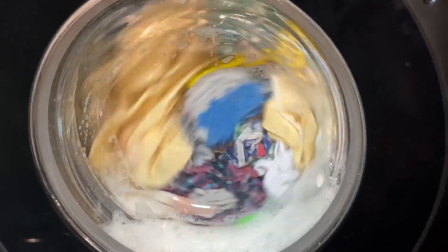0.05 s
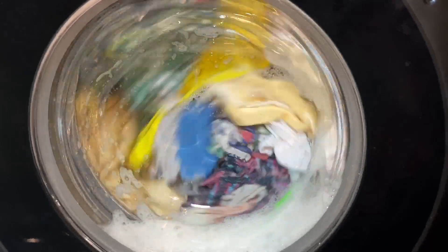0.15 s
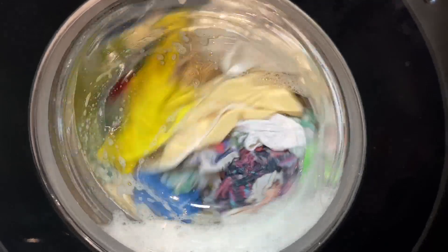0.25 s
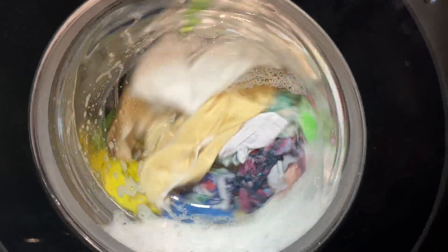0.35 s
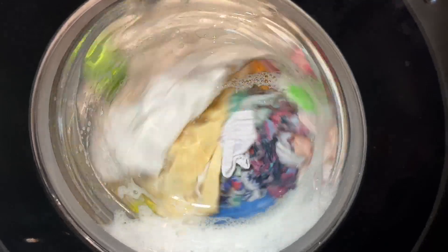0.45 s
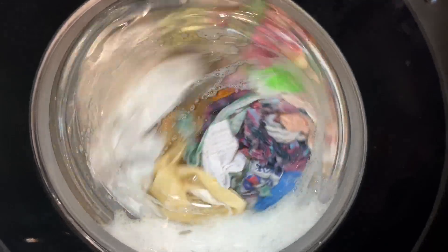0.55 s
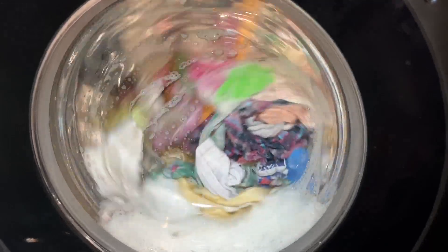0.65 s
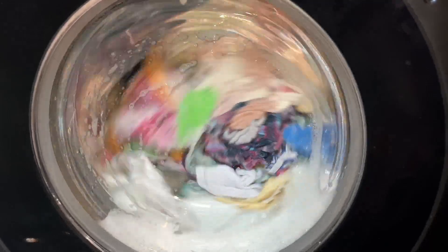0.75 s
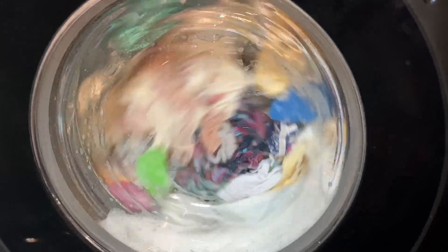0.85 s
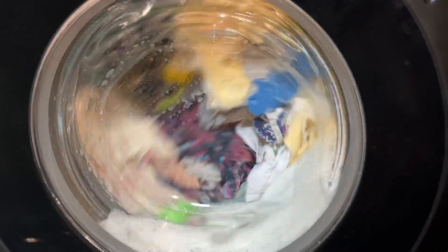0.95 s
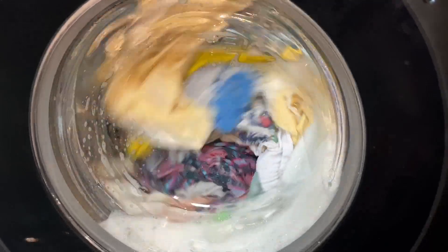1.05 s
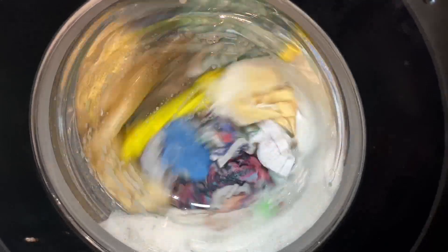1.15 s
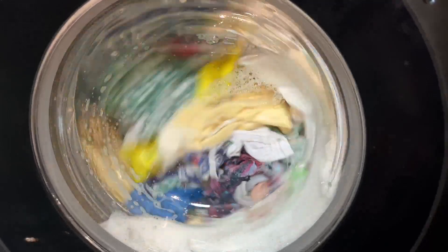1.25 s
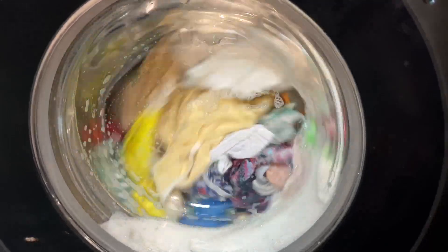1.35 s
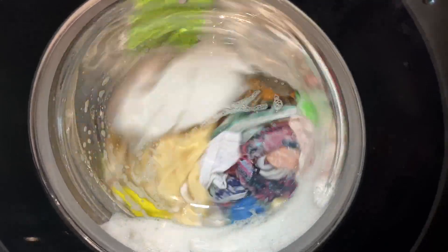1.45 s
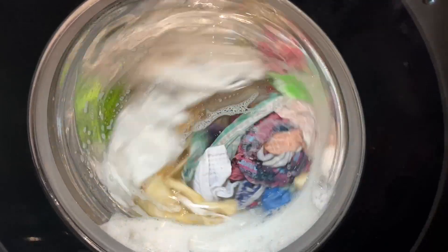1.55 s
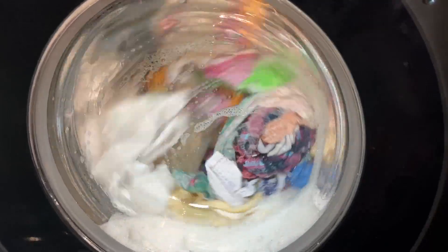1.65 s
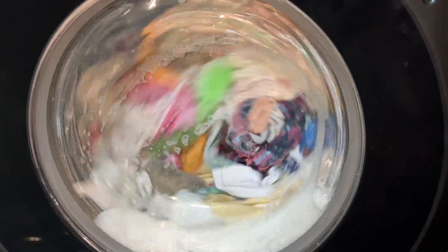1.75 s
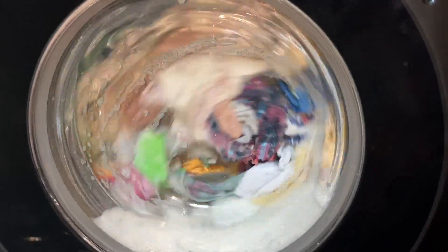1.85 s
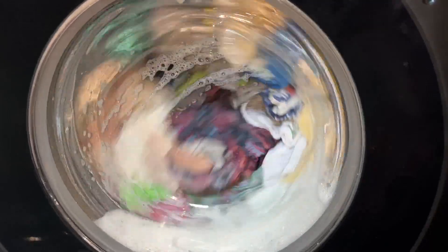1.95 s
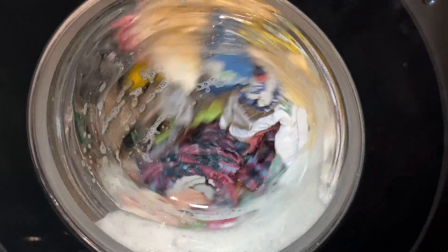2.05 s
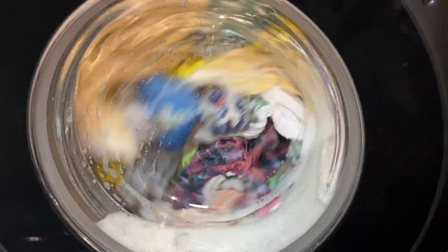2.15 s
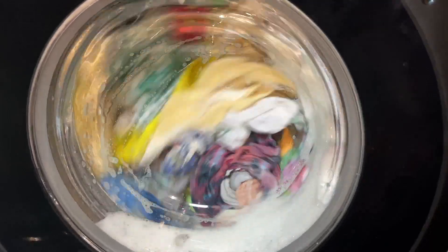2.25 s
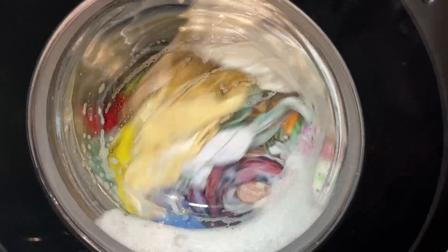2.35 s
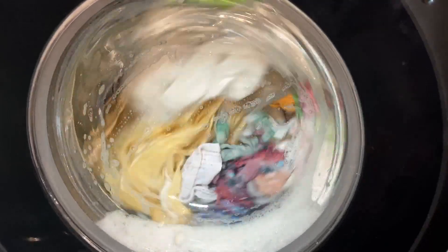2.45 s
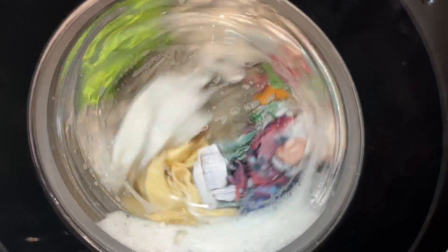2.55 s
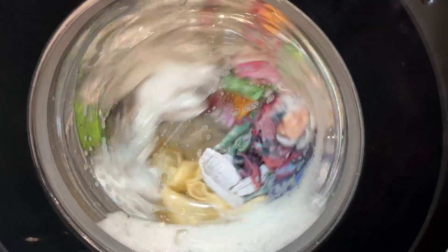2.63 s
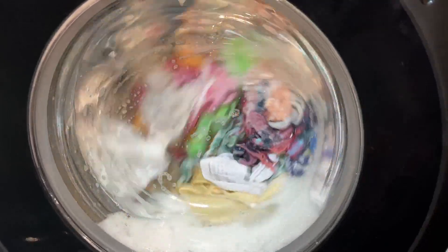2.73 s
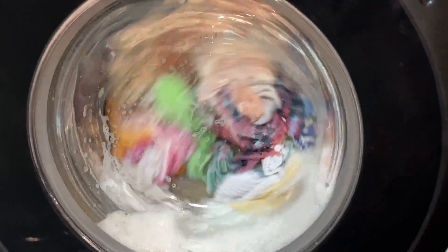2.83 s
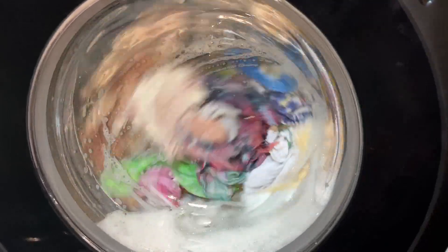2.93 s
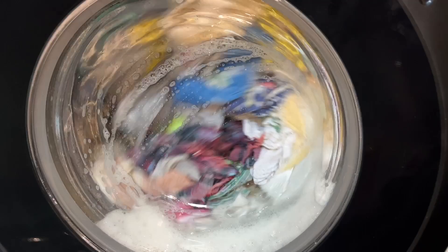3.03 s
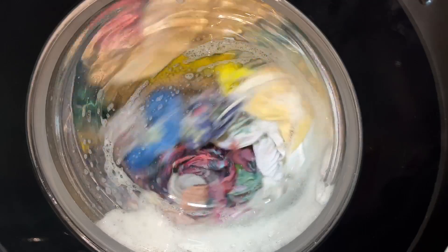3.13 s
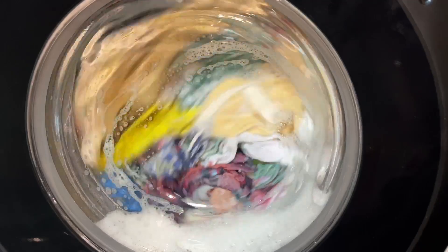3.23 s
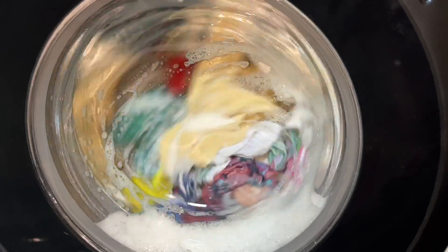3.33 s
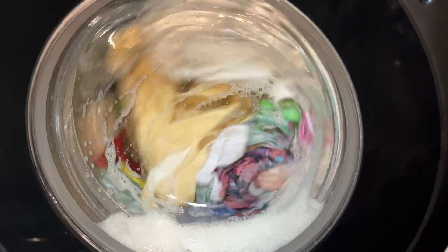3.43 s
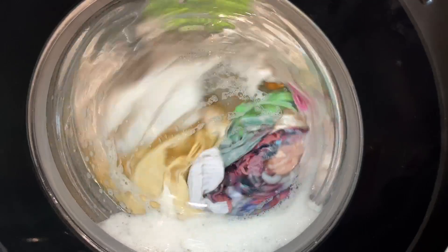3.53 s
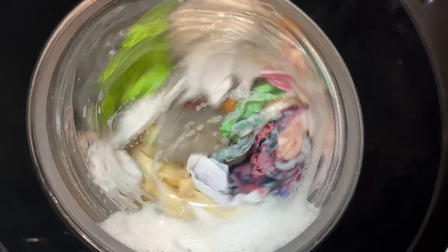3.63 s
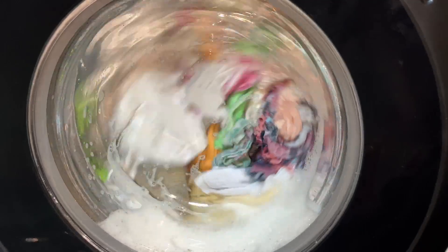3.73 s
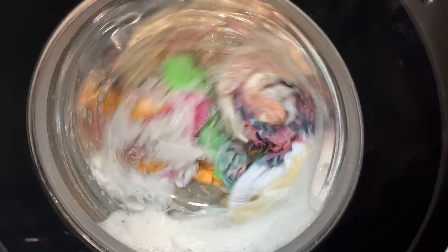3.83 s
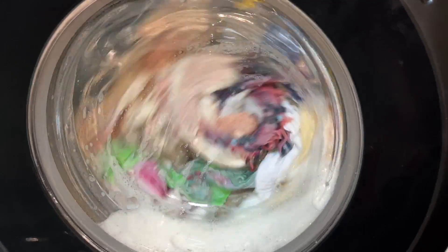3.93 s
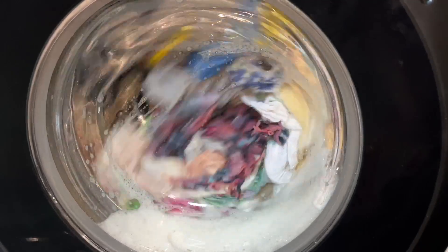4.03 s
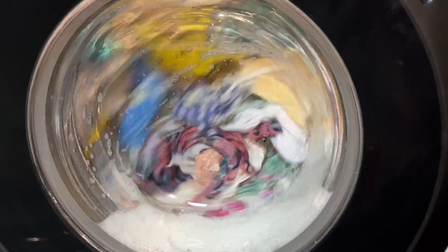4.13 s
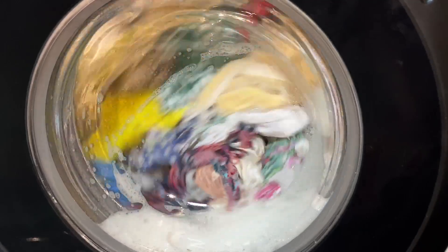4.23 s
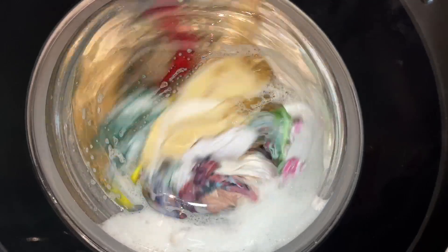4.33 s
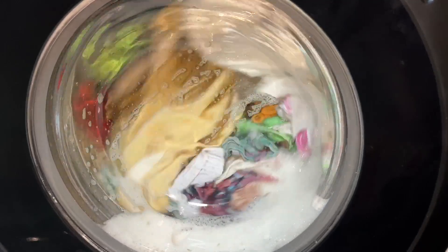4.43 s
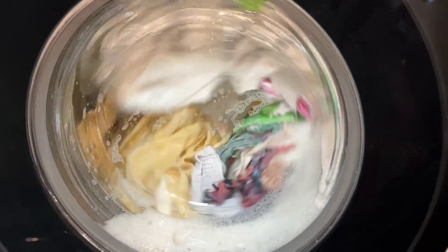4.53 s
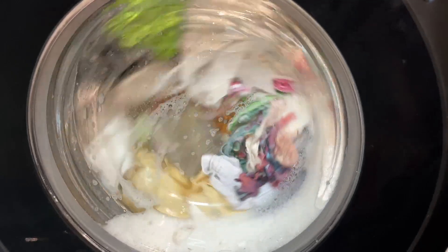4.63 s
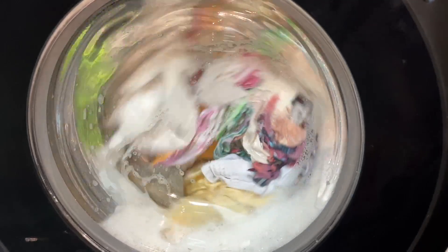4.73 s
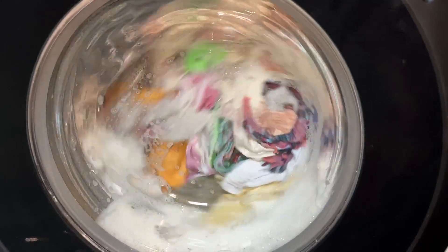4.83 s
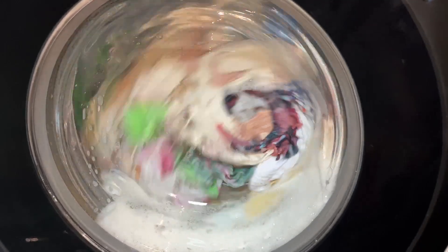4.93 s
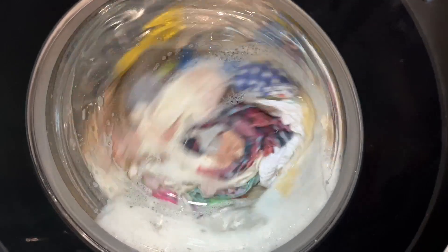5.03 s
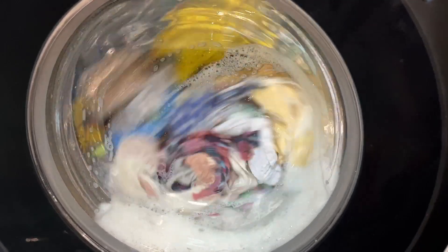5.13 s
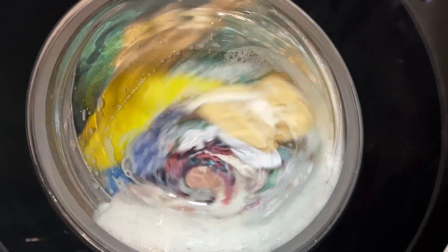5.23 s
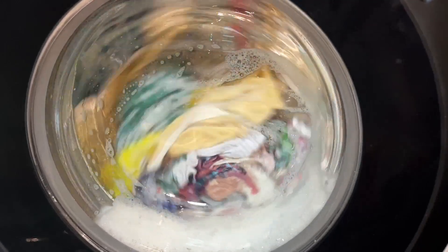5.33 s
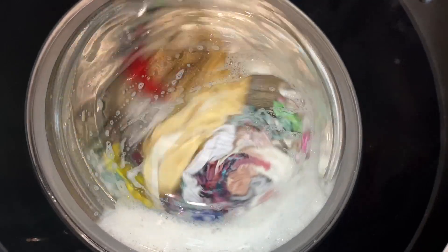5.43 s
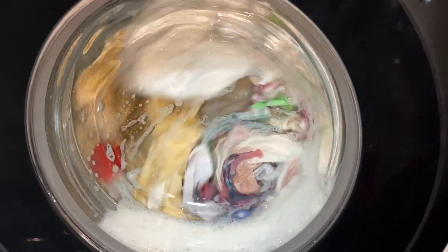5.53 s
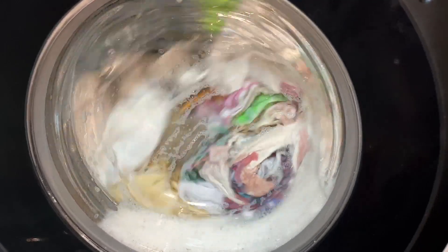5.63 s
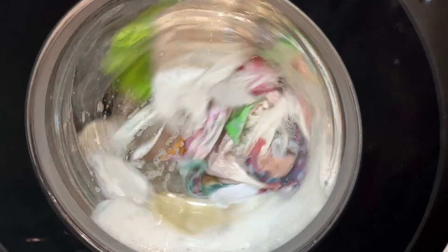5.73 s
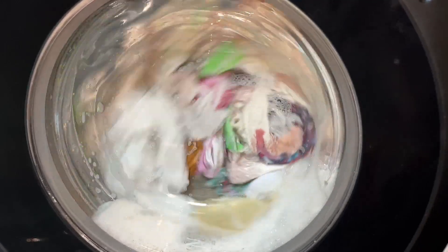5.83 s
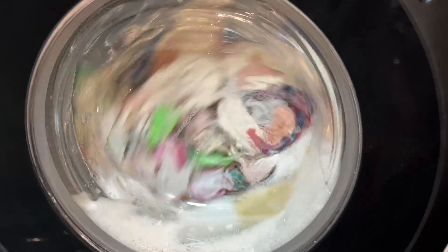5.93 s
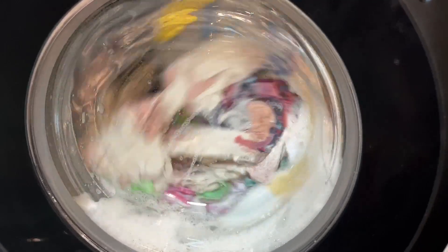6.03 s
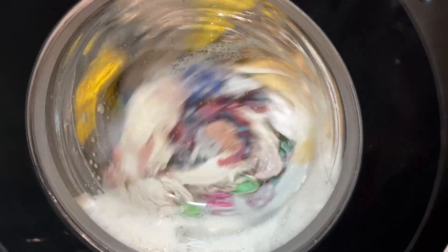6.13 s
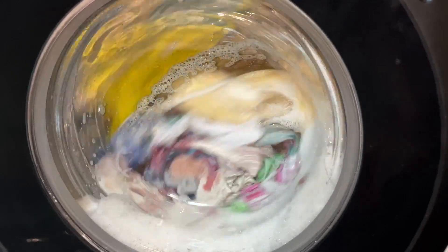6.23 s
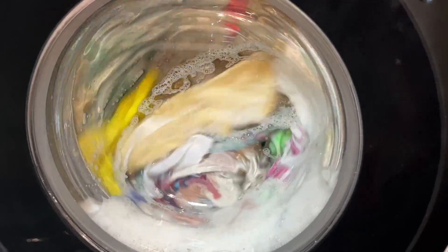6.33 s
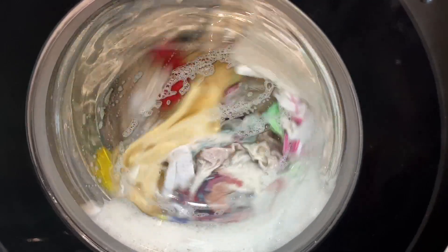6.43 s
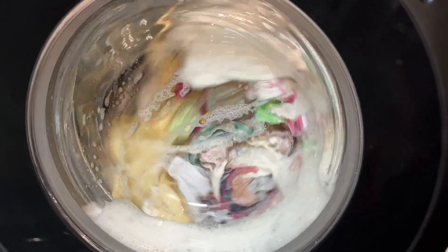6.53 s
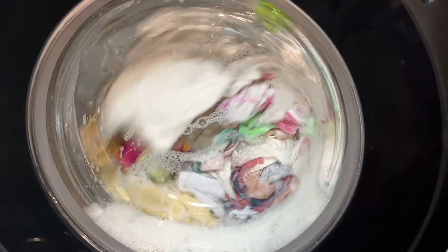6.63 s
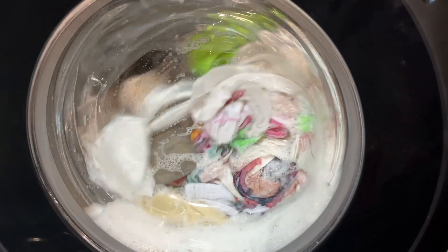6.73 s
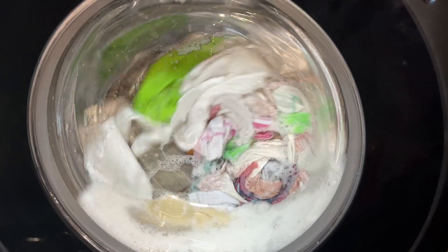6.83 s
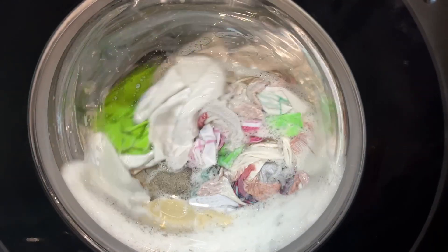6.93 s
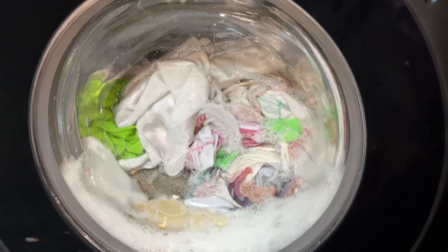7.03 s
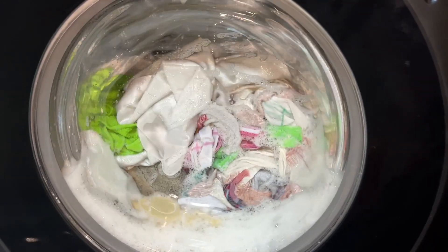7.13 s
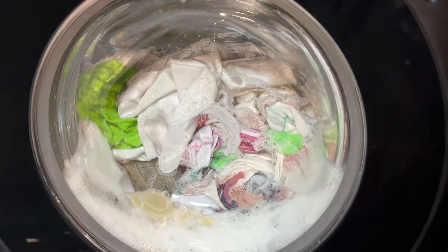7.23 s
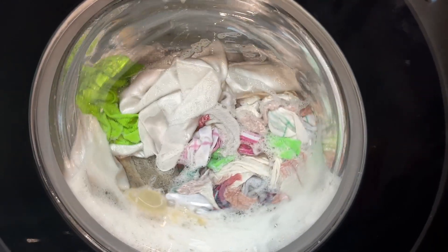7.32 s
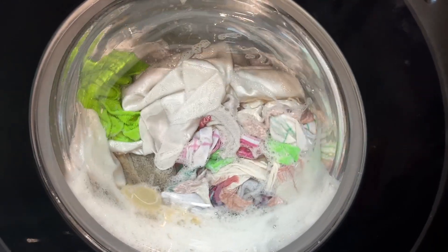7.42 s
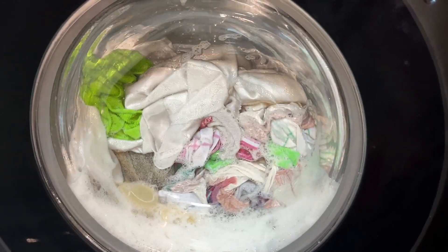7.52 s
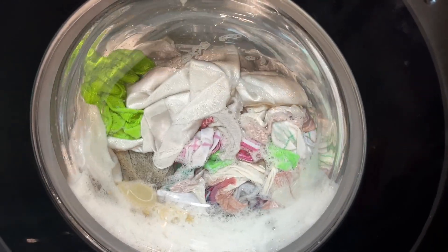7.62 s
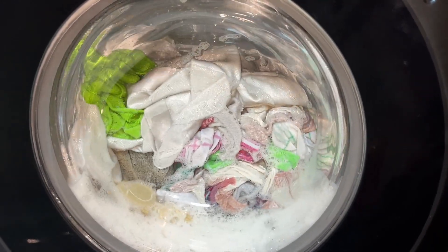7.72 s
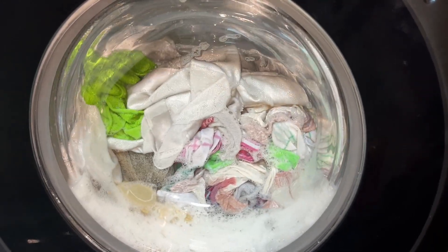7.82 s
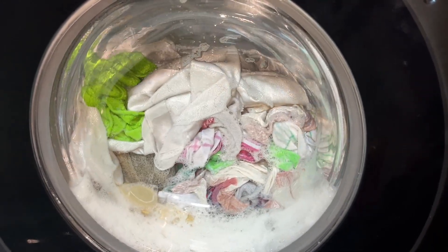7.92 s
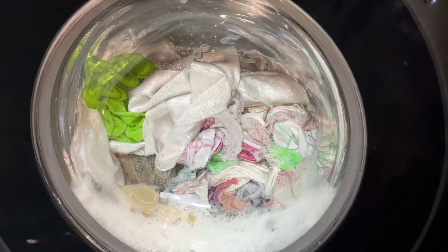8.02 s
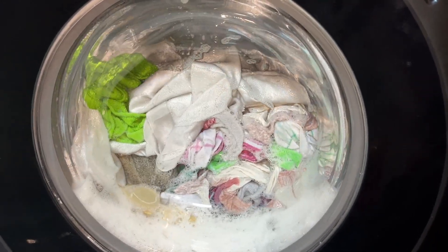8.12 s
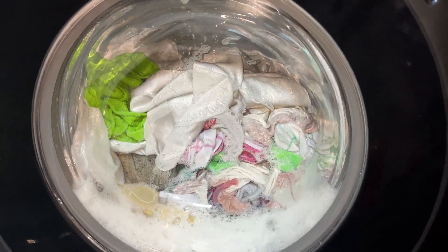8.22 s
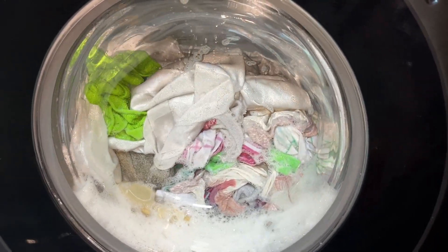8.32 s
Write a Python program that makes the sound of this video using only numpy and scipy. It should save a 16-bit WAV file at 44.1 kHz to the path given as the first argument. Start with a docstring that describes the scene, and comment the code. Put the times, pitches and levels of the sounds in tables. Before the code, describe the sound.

Wet laundry flops and slaps in a turning washing machine drum, water sloshing over low hum, until the motor cuts and near silence follows.

```python
"""In a quiet house, a front-loading washer tumbles a wet, soapy load before a phone, then coasts to a stop.
Noise surges, thuds, slaps and knocks ring drum, cabinet and door; a low hum swells and wanders.
The motor is a cluster of beating whine lines over drive hiss; an airy puff marks the drum at rest.
After the stop a second hum, a thin hiss and faint ticks set in; room rumble and a wavering tone lie beneath."""
import sys
import numpy as np
from scipy import signal
from scipy.fft import rfft, irfft, next_fast_len
from scipy.io import wavfile
from scipy.ndimage import uniform_filter1d

SR = 44100
rng = np.random.default_rng(int(sys.argv[2]) if len(sys.argv) > 2 else 0)


def persist_wave(psi):
    """Save psi, clipped to +-1, as 16-bit WAV."""
    counts = np.round(np.clip(psi, -1, 1) * 32767).astype(np.int16)
    wavfile.write(sys.argv[1], SR, np.atleast_2d(counts).T)


N = 369116


def undb(db):
    """Decibels to amplitude ratio."""
    return 10 ** (np.asarray(db) / 20)


def unit(x):
    """Scale to RMS 1."""
    return x / np.sqrt(np.mean(x ** 2))


def curves(table):
    """Columns of a time table, one value a sample; -150 past the last row."""
    s, *columns = np.transpose(table)
    return [np.interp(np.arange(N) / SR, s, column, right=-150) for column in columns]


def band(x, hz, width_hz):
    """Two-pole resonance, gain 1 at the centre."""
    return signal.lfilter(*signal.iirpeak(hz, hz / width_hz, fs=SR), x)


def ring(x, hz, t60_s):
    """One mode, as wide as its decay time asks."""
    return band(x, hz, np.log(1000) / (np.pi * t60_s))


def colour(x, peaks):
    """Sum of steep resonances, each a band passed twice."""
    return sum(undb(db) * band(band(x, hz, width_hz), hz, width_hz) for hz, width_hz, db in peaks)


def grains(rate_hz, spread_db, bed, smear_s):
    """Scattered tiny wet bursts, a few much larger, over an even bed of noise."""
    hit = rng.random(N) < rate_hz / SR
    power = hit * undb(2 * spread_db * rng.exponential(size=N))
    smear_pole = np.exp(-1 / (max(smear_s, 1e-4) * SR))
    power = signal.lfilter([1], [1, -smear_pole], power)
    gain = np.sqrt(power / np.mean(power) + bed ** 2)
    return unit(gain * rng.standard_normal(N))


def walk(rate_hz):
    """Random levels, one every 1 / rate_hz s, slewed; spread near 1."""
    step = int(SR / rate_hz)
    held = np.repeat(rng.standard_normal(N // step + 1), step)
    return uniform_filter1d(held, step)[:N]


def swells(peak_s, peak_db, rise_s, fall_s, bed_db):
    """Gain: swells climb 10 dB in the rise time and drop 10 dB in the fall time, added in power to a bed."""
    t = np.arange(0, N, 64) / SR
    power = undb(2 * bed_db[::64])
    for at, db, up, down in zip(peak_s, peak_db, np.maximum(rise_s, .01), np.maximum(fall_s, .01)):
        drop_db = 10 * np.where(t < at, (at - t) / up, (t - at) / down)
        power = power + undb(2 * (db - drop_db))
    return np.interp(np.arange(N) / SR, t, np.sqrt(power))


def wavering(hz, width_hz):
    """A tone that wanders in phase and keeps most of its size steady."""
    tone = band(band(rng.standard_normal(N), hz, width_hz), hz, width_hz)
    sway = signal.hilbert(tone, next_fast_len(N))[:N]
    return unit((sway / np.abs(sway) ** .8).real)


# drum and cabinet panel modes: pitch_hz, level_db, t60_s
PANEL_MODES = [(73.8, 2.5, 0.2), (120.3, -1, 0.15), (146, -0.5, 0.11), (192, -3, 0.098), (219, -3, 0.24),
               (239.7, -4, 0.12), (277, -1, 0.081), (327.3, -3, 0.16), (360.2, -0.5, 0.098),
               (415.8, -8, 0.07), (459.3, -5, 0.13), (493.5, -11, 0.034), (557.8, -3.5, 0.098),
               (628, -8.5, 0.14), (672.5, -12, 0.12), (782, -14.5, 0.074), (857, -13, 0.076),
               (951, -11.5, 0.045), (1071, -11.5, 0.028), (1203, -12.5, 0.068), (1279, -15, 0.046),
               (1432, -10.5, 0.037), (1548, -15, 0.053), (1674, -19.5, 0.19)]


def panels(force):
    """Drum and cabinet ring under a force; neighbours in opposite sign keep the valleys shallow."""
    return sum((-1) ** k * undb(db) * ring(force, hz, t60_s)
               for k, (hz, db, t60_s) in enumerate(PANEL_MODES))


def halves(force):
    """Panel ring split into low body and brighter top; the casing holds back what lies above."""
    full = panels(force)
    low = signal.butter(4, 720, fs=SR, output="sos")
    top = signal.butter(3, (720, 2000), "band", fs=SR, output="sos")
    return signal.sosfilt(low, full), signal.sosfilt(top, full)


# load rolling over and falling through suds: peak_s, rubbing_db, slosh_db, spray_db, rise_s, fall_s
LOAD_SURGES = [(0.0, -33.5, -40.5, -42.5, 0.03, 0.012), (0.14, -40.5, -47.5, -56.5, 0.037, 0.092),
               (0.242, -39.5, -43, -58, 0.064, 0.093), (0.561, -40, -46.5, -57, 0.11, 0.072),
               (0.817, -38.5, -41.5, -57, 0.047, 0.011), (0.925, -36.5, -43.5, -58.5, 0.053, 0.094),
               (1.167, -45, -54, -63.5, 0.041, 0.15), (1.366, -39, -43.5, -55.5, 0.019, 0.08),
               (1.586, -43, -51, -58.5, 0.13, 0.024), (1.689, -39.5, -48, -59.5, 0.048, 0.074),
               (1.922, -35.5, -45, -54, 0.097, 0.025), (2.011, -39, -46.5, -61, 0.037, 0.031),
               (2.239, -45.5, -45.5, -56.5, 0.084, 0.046), (2.375, -38, -46.5, -59.5, 0.047, 0.051),
               (2.577, -43, -50, -59, 0.033, 0.17), (2.969, -33.5, -41, -54, 0.098, 0.069),
               (3.213, -41, -47, -60, 0.094, 0.073), (3.443, -35, -41, -57.5, 0.056, 0.054),
               (3.582, -32, -41, -52, 0.016, 0.038), (3.841, -37.5, -49, -59, 0.12, 0.051),
               (3.97, -38.5, -46.5, -55.5, 0.039, 0.14), (4.18, -44.5, -48.5, -61, 0.024, 0.44),
               (4.429, -37.5, -52, -57, 0.024, 0.063), (4.634, -35, -43.5, -53.5, 0.033, 0.023),
               (4.762, -40, -51, -56.5, 0.036, 0.15), (5.029, -37, -42, -54.5, 0.035, 0.05),
               (5.162, -40, -61, -69, 0.096, 0.063), (5.373, -42, -47.5, -56.5, 0.078, 0.02),
               (5.537, -40, -46.5, -57.5, 0.15, 0.058), (5.66, -34.5, -49.5, -59, 0.042, 0.03),
               (5.848, -34.5, -52, -62, 0.031, 0.056), (6.01, -35.5, -45, -57.5, 0.069, 0.048),
               (6.19, -41.5, -45, -58.5, 0.098, 0.07), (6.425, -43, -49, -59.5, 0.15, 0.099),
               (6.65, -48, -62, -72, 0.02, 0.033), (6.728, -41.5, -52.5, -66, 0.083, 0.037),
               (6.999, -56.5, -69.5, -76, 0.13, 0.031), (7.129, -63, -76, -86, 0.03, 0.079),
               (7.259, -73, -88, -87, 0.056, 0.22)]
# churn between surges, coasting, draining: time_s, rubbing_db, slosh_db, spray_db, low_hum_db
STEADY_CHURN = [(0, -53, -61, -66.5, -50.5), (6.499, -50, -62.5, -67.5, -53), (6.75, -60, -79, -81, -45),
                (6.85, -55, -79, -97, -48), (7.03, -61, -77, -97, -43), (7.09, -74, -88, -100, -61),
                (7.3, -82, -96, -102, -81), (7.4, -85, -91, -102, -78), (8.4, -87, -96, -102, -80)]
# door resonances under spray and slaps: centre_hz, width_per_pass_hz, level_db
DOOR_MODES = [(1890, 664, 1.5), (2247, 486, 1.5), (2710, 223, 1.5), (3504, 450, -0.5), (4240, 410, -5),
              (5350, 290, -13), (6195, 2000, -9), (8400, 270, -30), (10400, 9600, -20)]


def tumble():
    """Cloth drags over the lifters, water sloshes and sprays; all is heard through the body."""
    peak_s, *peaks_db, rise_s, fall_s = np.transpose(LOAD_SURGES)
    rubbing, sloshing, spraying = (swells(peak_s, db, rise_s, fall_s, bed_db)
                                   for db, bed_db in zip(peaks_db, curves(STEADY_CHURN)))
    rub = grains(300, 2, .7, .006)
    slosh = grains(300, 2.3, 0.46, 0.0039)
    spray = grains(200, 2.27, 0.5, 0.0092)
    body = undb(23.0) * halves(rub * rubbing)[0]
    water = undb(28.0) * halves(slosh * sloshing)[1]
    # suds on the glass muffle the spray
    muffled = signal.lfilter(*signal.butter(1, 3500, fs=SR), spray * spraying)
    return body + water + slops(sloshing) + undb(12.0) * colour(muffled, DOOR_MODES)


SLOPS_PER_S, SLOP_LOW_HZ, SLOP_HIGH_HZ = 60, 200, 1200
SLOP_CYCLES, SLOP_GLIDE, SLOP_RE_SLOSH_DB = 6, .04, -3


def slops(sloshing):
    """Pockets of water collapse, each a short gulp at its own rising pitch, following the slosh level."""
    out = np.zeros(N + SR)
    t = np.arange(SR // 10) / SR
    for at, pitch, size in rng.random((int(SLOPS_PER_S * N / SR), 3)):
        i = int(at * N)
        hz = SLOP_LOW_HZ * (SLOP_HIGH_HZ / SLOP_LOW_HZ) ** pitch
        age = hz * t / SLOP_CYCLES
        tone = np.sin(2 * np.pi * hz * t * (1 + SLOP_GLIDE * age))
        gulp = tone * age * np.exp(1 - 3 * age)
        out[i:i + len(t)] += undb(-14 * size) * gulp
    return unit(out[:N]) * sloshing * undb(SLOP_RE_SLOSH_DB)


# wet laundry landing: start_s, level_db, pitch_hz, contact_s (floored at 0.002 when played)
LANDINGS = [(0.128, -39, 358, 0.016), (0.167, -31, 298, 0.0048), (0.234, -36, 364, 0.015),
            (0.354, -36.5, 343, 0.0038), (0.765, -39, 378, 0.019), (0.825, -24.5, 414, 0.0019),
            (0.907, -37, 139, 0.0089), (0.969, -42, 273, 0.0054), (1.161, -33, 282, 0.0031),
            (1.365, -25, 365, 0.0038), (1.53, -32.5, 186, 0.0063), (1.691, -26, 254, 0.0032),
            (1.905, -30.5, 272, 0.0077), (2.23, -23.5, 367, 0.0052), (2.365, -30.5, 227, 0.0047),
            (2.827, -34.5, 303, 0.0098), (2.963, -25, 362, 0.0056), (3.019, -34, 192.5, 0.014),
            (3.433, -32.5, 358, 0.006), (3.582, -23, 262, 0.0036), (3.932, -31.5, 240, 0.0069),
            (4.42, -27.5, 350, 0.0036), (4.435, -31, 323, 0.005), (4.456, -30.5, 323, 0.0034),
            (4.624, -25, 366, 0.0038), (4.647, -25.5, 369, 0.0045), (4.741, -42.5, 121, 0.012),
            (4.923, -40.5, 276, 0.0049), (5.02, -19.5, 155, 0.0025), (5.305, -35, 353, 0.008),
            (5.366, -35.5, 255, 0.0044), (5.531, -25.5, 232, 0.0047), (5.656, -33, 335, 0.0058),
            (5.837, -28.5, 344, 0.0067), (6.196, -36, 266, 0.0031), (6.441, -35, 267, 0.0054),
            (6.678, -41, 367, 0.008), (6.73, -43.5, 349, 0.0055)]
THUD_LEAD_S = .0015  # push starts before the panels are heard


def thuds():
    """Each landing is a ragged push that swells over the contact time; the lump squashes at its own pitch."""
    push, squash = np.zeros((2, N + SR))
    t = np.arange(SR // 5) / SR
    noise = rng.standard_normal((len(LANDINGS), len(t)))
    for (start_s, db, hz, contact_s), ragged in zip(LANDINGS, noise):
        i = int((start_s - THUD_LEAD_S) * SR)
        contact_s = max(contact_s, .002)
        swell = undb(db) * t / contact_s * np.exp(1 - t / contact_s)
        lump = np.sin(2 * np.pi * hz * t)
        push[i:i + len(t)] += swell * (lump + 1.95 * ragged)
        squash[i:i + len(t)] += swell * lump
    return (undb(1.0) * halves(push)[0] + undb(-4.0) * squash)[:N]


# wet slaps while turning; from 8 s, faint ticks after the stop: start_s, level_db, dull_re_level_db, t60_s
SLAPS_AND_TICKS = [(0.122, -47.5, 13.5, 0.11), (0.37, -62, 16, 0.12), (0.5501, -50, 7, 0.11),
                   (0.7359, -59, 14.5, 0.45), (0.82, -42, -10, 0.044), (0.8747, -56.5, 17.5, 0.12),
                   (0.913, -48.5, 6.5, 0.32), (1.1596, -49.5, 11, 0.055), (1.354, -45.5, 14, 0.092),
                   (1.5782, -48.5, 10, 0.091), (1.687, -45, 3, 0.032), (1.815, -57.5, 19, 0.085),
                   (1.862, -59.5, 23, 0.064), (1.9151, -47, 5, 0.11), (1.996, -49.5, 8.5, 0.16),
                   (2.219, -67, 8, 0.12), (2.3452, -53, 9, 0.37), (2.563, -55, 12, 0.34),
                   (2.834, -52, -17, 0.14), (2.949, -41.5, 11, 0.2), (3.195, -68, 25.5, 0.16),
                   (3.364, -50, 7, 0.073), (3.425, -50, 15.5, 0.089), (3.457, -47.5, -19, 0.12),
                   (3.5676, -47.5, 5, 0.15), (3.7523, -50.5, 12, 0.37), (3.958, -45, 13.5, 0.11),
                   (4.151, -53, 11.5, 0.27), (4.415, -49.5, 13.5, 0.21), (4.6201, -46.5, 12.5, 0.24),
                   (4.7357, -59, 22.5, 0.51), (5.016, -41.5, 13, 0.096), (5.1461, -58, 19.5, 0.26),
                   (5.37, -44.5, 4, 0.054), (5.4938, -51, 14, 0.058), (5.6459, -50.5, 14.5, 0.25),
                   (5.8232, -47, 14.5, 0.32), (5.997, -46.5, 14.5, 0.18), (6.1669, -46.5, 9, 0.16),
                   (6.372, -45.5, -13, 0.079), (6.408, -51, 9, 0.13), (6.5117, -56, 13, 0.16),
                   (6.637, -51, 8, 0.11), (6.7157, -49.5, 6.5, 0.17), (6.919, -74, 16, 0.08),
                   (6.958, -73, 14, 0.11), (6.984, -61, 8, 0.15), (7.096, -77, 13.5, 0.17),
                   (7.25, -77, 7, 0.12), (8, -85, 19, 0.055), (8.183, -90, 23, 0.2), (8.258, -73, -2, 0.1),
                   (8.324, -74.5, 9.5, 0.26)]
SLAP_LEAD_S, SLAP_RISE_S = .0025, 0.0032  # burst starts before it is heard; spatter builds up


def slaps():
    """A knock and a sudden, spattering burst ring the door and upper panel modes, then fade; late ones tick."""
    bright, dull = np.zeros((2, N + SR))
    t = np.arange(SR // 4) / SR
    knock = 1 + 0.23 * np.exp(-t / 0.0014)  # first contact is the hardest
    rise = np.minimum(t / SLAP_RISE_S, 1)
    noise = rng.standard_normal((len(SLAPS_AND_TICKS), 3, len(t)))
    pitch_hz = rng.uniform(677, 2000, len(SLAPS_AND_TICKS))  # each has its own tone
    for (start_s, db, dull_db, t60_s), (hiss, thump, spatter), hz in zip(SLAPS_AND_TICKS, noise, pitch_hz):
        i = int((start_s - SLAP_LEAD_S) * SR)
        fade = np.exp(-t * np.log(1000) / max(t60_s, .02))
        spatter = spatter + 20 * uniform_filter1d(spatter, size=200)  # spatter comes in clumps
        bright[i:i + len(t)] += undb(db + 1.9 * spatter) * rise * fade * hiss
        toned = thump + 1.88 * band(thump, hz, hz / 6)
        dull[i:i + len(t)] += undb(db + dull_db) * knock * fade * toned
    return (undb(5.0) * colour(bright, DOOR_MODES) + undb(20.5) * halves(dull)[1])[:N]


# something firm in the load tapping the drum wall: start_s, peak_envelope_db, pitch_hz
WALL_KNOCKS = [(0.1205, -35.5, 1105), (0.3703, -50, 990), (0.877, -42.5, 1410), (0.9067, -42, 1015),
               (1.3546, -36.5, 975), (1.5785, -43, 980), (1.8597, -48, 1360), (2.2206, -42, 1050),
               (2.3458, -48, 1060), (2.5626, -41.5, 765), (2.953, -33, 1500), (3.4315, -37.5, 1067),
               (3.4562, -37, 960), (3.565, -41.5, 1465), (4.4162, -38, 990), (5.011, -45, 1450),
               (5.144, -49, 1545), (5.4925, -37, 1120), (5.8193, -42, 1464), (6.9847, -57, 1480),
               (7.2451, -70, 885)]
KNOCK_RISE_S = .003


def knocks():
    """A few cycles at the pitch of the struck spot, swelling fast and damped by the wet load."""
    out = np.zeros(N + SR)
    t = np.arange(SR // 20) / SR
    shape = t / KNOCK_RISE_S * np.exp(1 - t / KNOCK_RISE_S)
    for start_s, db, hz in WALL_KNOCKS:
        i = int(start_s * SR)
        out[i:i + len(t)] += undb(db) * shape * np.sin(2 * np.pi * hz * t)
    return out[:N]


# swells of the low hum: peak_s, level_db, fall_s
HUM_SWELLS = [(0.019, -34, 0.028), (0.286, -29, 0.027), (0.394, -40, 0.071), (0.584, -37, 0.058),
              (1.027, -32, 0.013), (1.202, -36, 0.036), (1.372, -36.5, 0.042), (1.611, -44, 0.024),
              (1.701, -49, 0.023), (1.906, -33.5, 0.17), (2.29, -35, 0.018), (2.39, -39.5, 0.029),
              (2.464, -42, 0.018), (2.574, -34, 0.069), (2.753, -38.5, 0.045), (3.009, -27, 0.12),
              (3.283, -35, 0.019), (3.387, -40, .03), (3.457, -35, 0.034), (3.598, -32, 0.065),
              (3.832, -33.5, 0.068), (3.981, -35, 0.033), (4.131, -38.5, 0.023), (4.205, -40.5, 0.26),
              (4.365, -38.5, 0.036), (4.45, -36.5, 0.037), (4.679, -31.5, 0.024), (4.774, -42, 0.022),
              (4.859, -40, 0.013), (5.049, -32.5, 0.025), (5.138, -33.5, 0.03), (5.368, -46.5, .1),
              (5.493, -38, .05), (5.557, -34, 0.053), (5.702, -32.5, 0.1), (5.893, -29.5, 0.072),
              (6.236, -33, 0.11), (6.48, -36, 0.12), (6.839, -39, 0.085)]
# low hum tones: centre_hz, wander_width_per_pass_hz, level_db
HUM_TONES = [(64.5, 5.5, 0), (84, 12, -10), (48, 10, -15), (28, 16, -21)]
HUM_RISE_S = 0.043


def low_hum():
    """Wandering low tones swell and wander in level; a resonance at each tone rounds off the swells."""
    peak_s, swell_db, fall_s = np.transpose(HUM_SWELLS)
    bed_db = curves(STEADY_CHURN)[3]
    gain = swells(peak_s, swell_db, HUM_RISE_S + 0 * peak_s, fall_s, bed_db)
    return sum(undb(db - 1.0) * band(wavering(hz, width_hz) * gain, hz, 49)
               for hz, width_hz, db in HUM_TONES)


# motor drive, steady then switched off: time_s, whine_db, drive_hiss_db
MOTOR_LEVELS = [(0.0, -64.5, -78.5), (6.4, -64, -79.5), (6.5, -77, -83), (6.74, -81.5, -81.5),
                (7.03, -89, -99), (7.4, -100, -108)]
# whine lines: centre_hz, wander_width_per_pass_hz, level_db
WHINE_LINES = [(2458, 24, -10), (2481, 26, -7), (2522, 34, -3.5), (2546, 30, -10), (2595, 30, -11)]
# drive hiss colour: centre_hz, width_per_pass_hz, level_db
DRIVE_HISS_PEAKS = [(10200, 2200, 0), (11700, 2000, 1), (13000, 2000, -1)]
TURNS_PER_S, TURN_DROP_DB, FLUTTER_DB = 9.3, 7, 2.8
FIRST_SWELL_TURNS = .25  # share of a turn before the first swell


def motor():
    """Whine lines that beat together, jump up once a turn and sag; the steady hiss of the drive."""
    whine_db, hiss_db = curves(MOTOR_LEVELS)
    turn = (TURNS_PER_S * np.arange(N) / SR - FIRST_SWELL_TURNS) % 1
    throb_db = uniform_filter1d(TURN_DROP_DB * (.5 - turn), size=600) + FLUTTER_DB * walk(70)
    lines = sum(undb(db) * wavering(hz, width_hz) for hz, width_hz, db in WHINE_LINES)
    hiss = unit(colour(rng.standard_normal(N), DRIVE_HISS_PEAKS))
    return lines * undb(whine_db + throb_db) + hiss * undb(hiss_db + 0.95 * walk(27))


# airy hiss as the drum settles: peak_s, level_db, rise_s, fall_s
SETTLE_PUFF = (7.115, -74, .02, .08)
# its colour: centre_hz, width_per_pass_hz, level_db
SETTLE_PEAKS = [(2550, 500, 0), (3100, 500, 0), (4300, 900, -10)]


def settle():
    """A brief airy hiss, coloured noise under one swell, when the drum comes to rest."""
    puff = swells(*np.transpose([SETTLE_PUFF]), np.full(N, -150))
    return unit(colour(rng.standard_normal(N), SETTLE_PEAKS)) * puff


# after the stop: time_s, hum_db, hiss_db
AFTER_LEVELS = [(7.99, -100, -120), (8.01, -62, -110), (8.07, -62.5, -88), (8.2, -64, -89),
                (8.25, -63, -89), (8.37, -65, -87)]


def after_stop():
    """A low hum through the cabinet and a thin high hiss, both shaped noise."""
    hum_db, hiss_db = curves([(0.0022, -150, -150)] + AFTER_LEVELS + [(9, -63, -89)])
    hum = panels(rng.standard_normal(N))
    hum = hum + colour(rng.standard_normal(N), [(170, 63, 9.5), (517, 130, -1.0)])
    hum = signal.sosfilt(signal.butter(6, 630, fs=SR, output="sos"), hum)
    hiss = colour(rng.standard_normal(N), [(11500, 2000, 0)])
    return unit(hum) * undb(hum_db + 2.7 * walk(25)) + unit(hiss) * undb(hiss_db)


# room rumble spectrum, shape only: pitch_hz, density_db
ROOM_SPECTRUM = [(15, -37.5), (25, -19), (54, 5.5), (70, -4), (119, -8.5), (167, -25.5), (2670, -51),
                 (3130, -54.5), (3570, -51), (11400, -64), (13700, -52)]
ROOM_RMS_DB = -54.5  # before the slow drift
# faint tone: centre_hz, wander_width_per_pass_hz, steady_db
ROOM_TONE = (3200, 90, -104)
# its fades in and out: peak_s, level_db, rise_s, fall_s
ROOM_TONE_SWELLS = [(6.8, -85, .1, .1), (7.13, -87, 0.066, .08), (7.33, -88, .08, 0.16),
                    (7.62, -88, .04, .06), (7.75, -89, .04, .05), (7.87, -85, .04, .07),
                    (8.025, -81.5, .06, 0.064), (8.17, -88, .05, .05), (8.33, -86, 0.08, .07)]


def room():
    """Quiet house rumble, noise shaped in frequency, with a faint wavering tone."""
    log_hz = np.log(np.fft.rfftfreq(N, 1 / SR) + 1)
    at_hz, density_db = np.transpose(ROOM_SPECTRUM)
    shape = undb(np.interp(log_hz, np.log(at_hz), density_db))
    air = irfft(rfft(rng.standard_normal(N)) * shape, N)
    tone_hz, width_hz, steady_db = ROOM_TONE
    fades = swells(*np.transpose(ROOM_TONE_SWELLS), np.full(N, steady_db))
    tone = wavering(tone_hz, width_hz) * fades * undb(3.9 * walk(40))
    return unit(air) * undb(ROOM_RMS_DB + 1.4 * walk(2.1)) + tone


def washer():
    """Everything heard along one path, room included."""
    machine = low_hum() + tumble() + thuds() + knocks() + slaps() + motor() + settle()
    return machine + after_stop() + room()


# phase between two microphone ports: pitch_hz, left_lead_rad
PORT_LEADS = [(30, 0), (100, .04), (200, .3), (400, .5), (700, .8), (1030, 1), (1460, 3), (1810, .5),
              (2670, 1.1), (3530, .4), (4390, 1.1), (5770, -1), (6700, -1.2), (8200, -3.14), (11700, -6.3),
              (12400, -7.8), (14000, -8.3)]
# port balance: pitch_hz, left_minus_right_db, share_from_all_sides (power, 0-1)
PORT_BALANCE = [(90, 0, .0003), (130, 0, .02), (220, -.5, .03), (350, -1, .035), (600, 3, .14),
                (1300, .5, .15), (2800, .5, .12), (4500, 4, .2), (7000, 1, .07), (8500, 0, .005),
                (12000, 0, .03)]


def ports(direct, around):
    """The ports hear the direct sound with their own phase, and sound from all sides in opposite sign."""
    log_hz = np.log(np.fft.rfftfreq(N, 1 / SR) + 1)
    at_hz, lean_db, share = np.transpose(PORT_BALANCE)
    lean_db = np.interp(log_hz, np.log(at_hz), lean_db)
    share = np.interp(log_hz, np.log(at_hz), share)
    phase_hz, lead_rad = np.transpose(PORT_LEADS)
    lead_rad = np.interp(log_hz, np.log(phase_hz), lead_rad)
    half = undb(lean_db / 2) * np.exp(.5j * lead_rad)  # each port takes half the difference
    near = np.sqrt(1 - share) * rfft(direct)
    wide = np.sqrt(share) * rfft(around)
    return irfft(np.array([(near + wide) * half, (near - wide) / half]), N)


def scene():
    """Front and flanks of the cabinet move with the same load but shake unrelatedly."""
    return ports(washer(), washer())


def record(dry):
    """The phone cuts the top with a steep low-pass at 13900 Hz."""
    return signal.sosfilt(signal.ellip(8, .2, 60, 13900, fs=SR, output="sos"), dry)


dry = scene()
out = record(dry)
persist_wave(out)
```